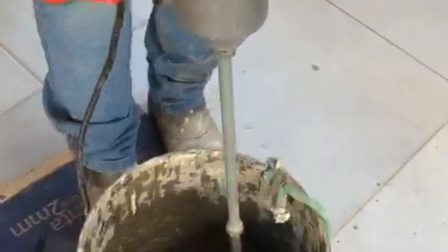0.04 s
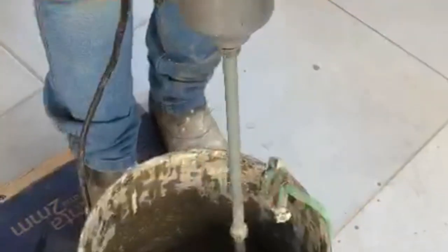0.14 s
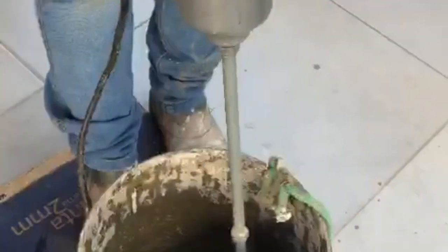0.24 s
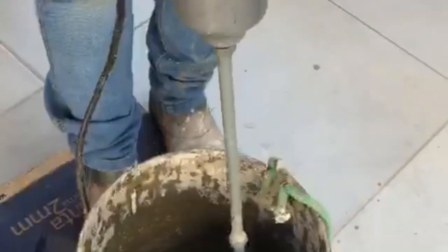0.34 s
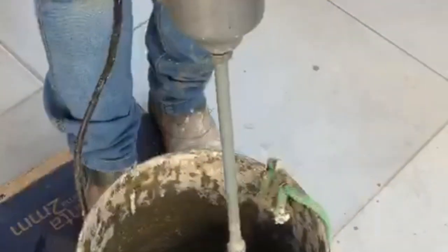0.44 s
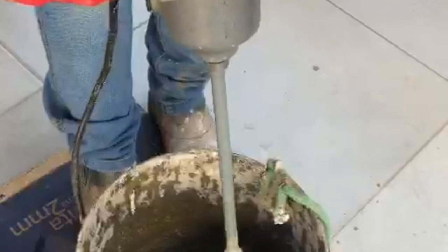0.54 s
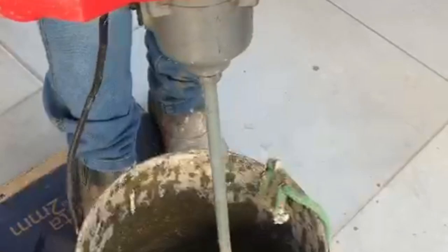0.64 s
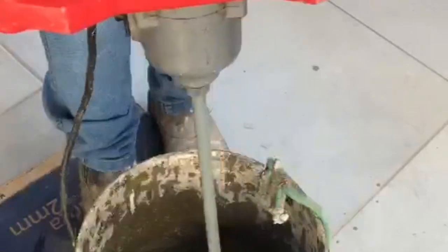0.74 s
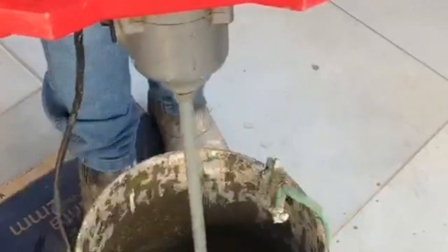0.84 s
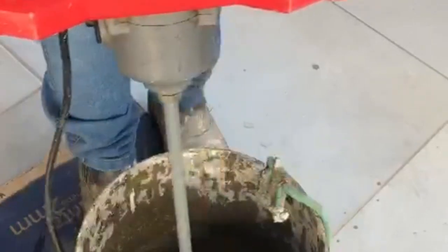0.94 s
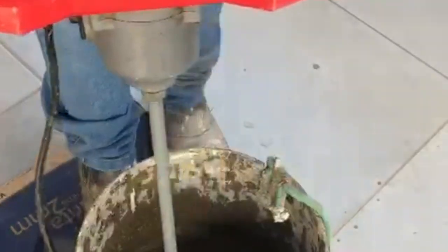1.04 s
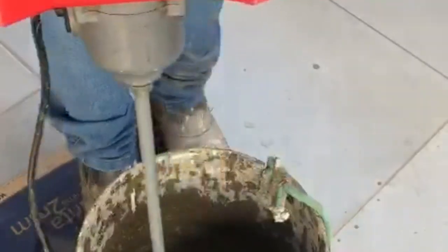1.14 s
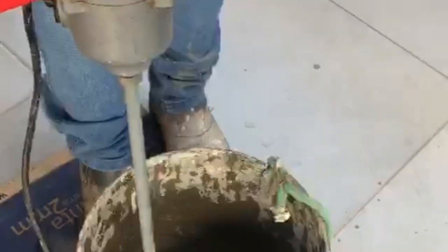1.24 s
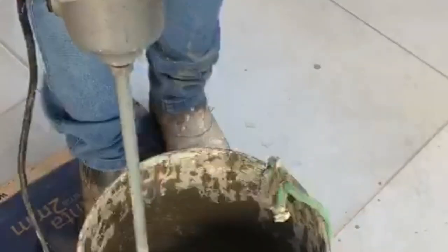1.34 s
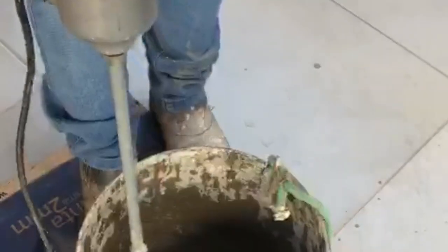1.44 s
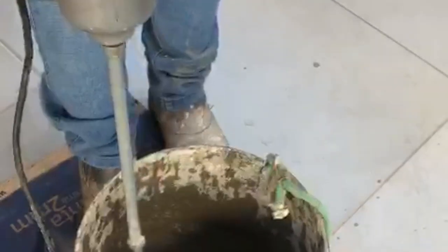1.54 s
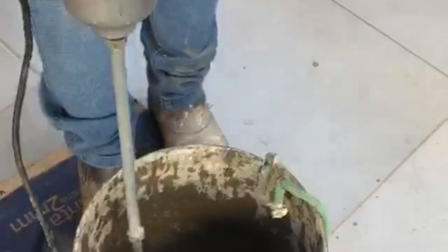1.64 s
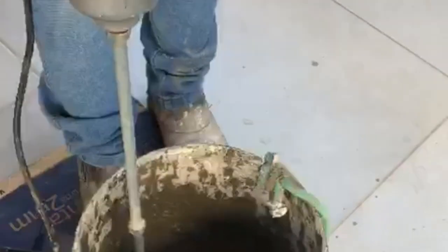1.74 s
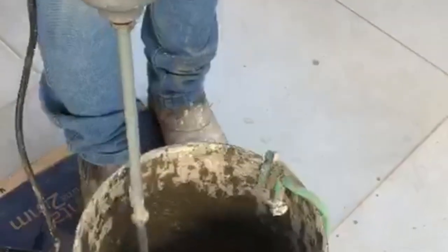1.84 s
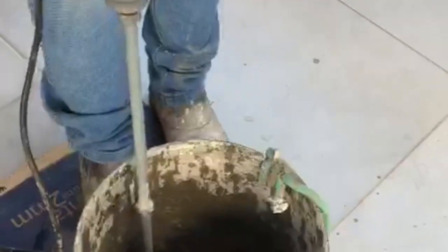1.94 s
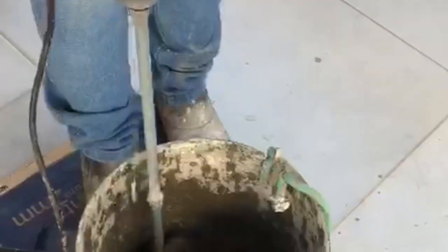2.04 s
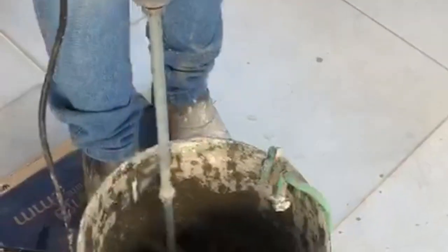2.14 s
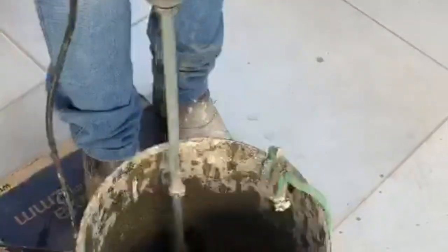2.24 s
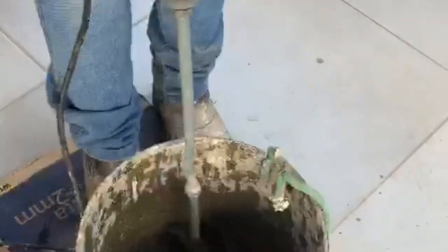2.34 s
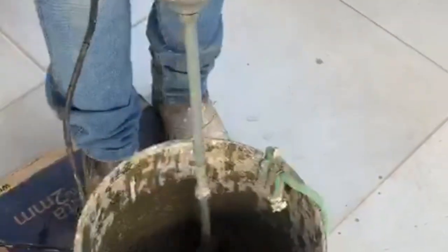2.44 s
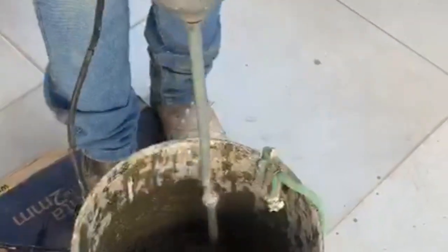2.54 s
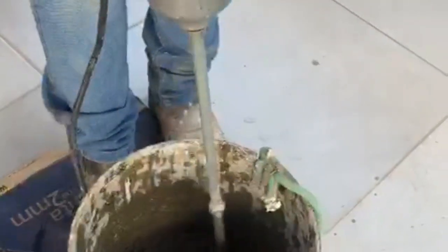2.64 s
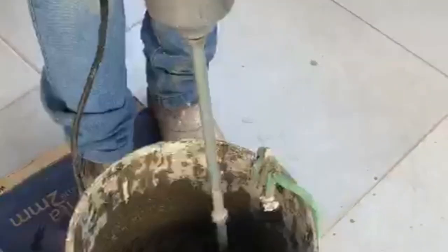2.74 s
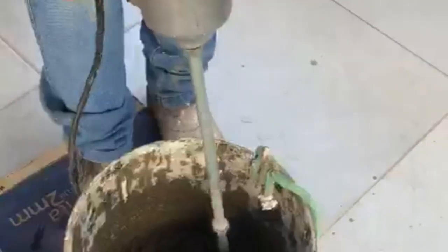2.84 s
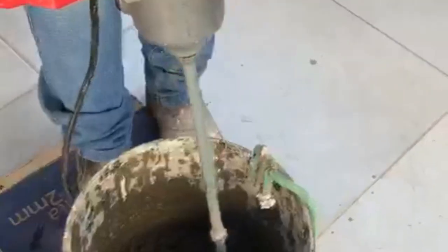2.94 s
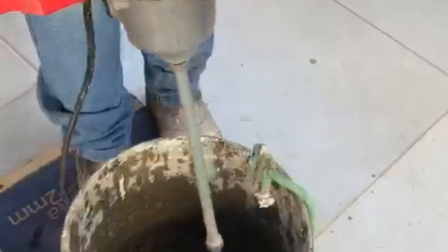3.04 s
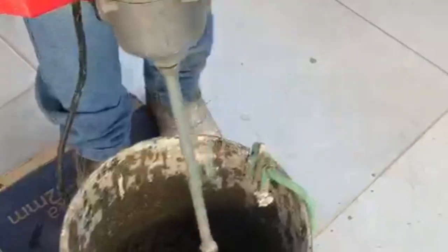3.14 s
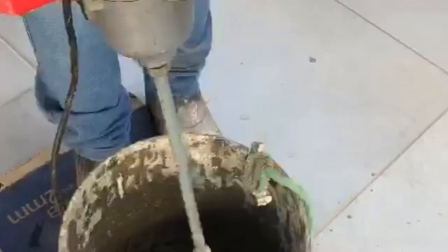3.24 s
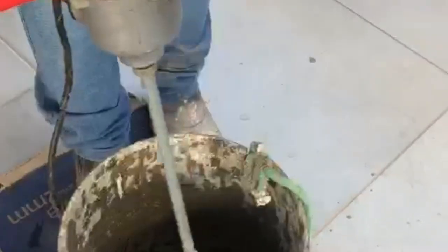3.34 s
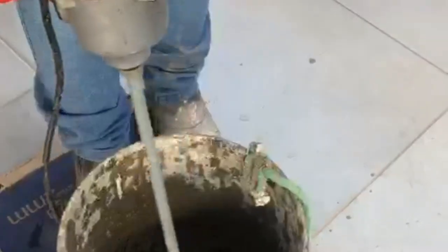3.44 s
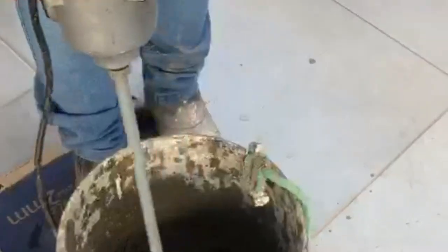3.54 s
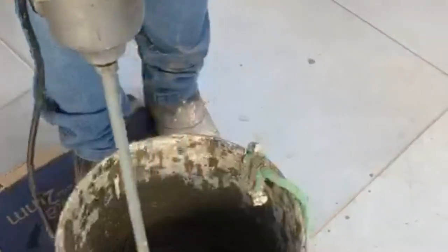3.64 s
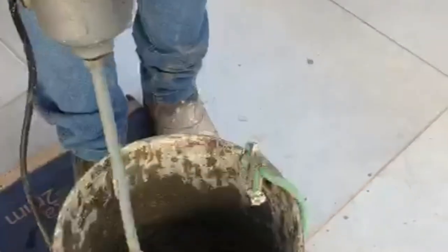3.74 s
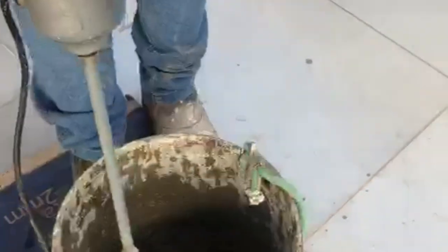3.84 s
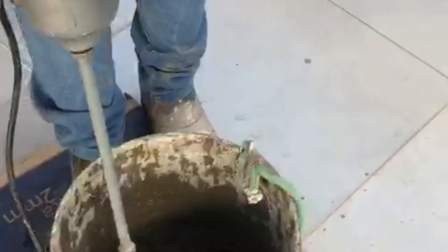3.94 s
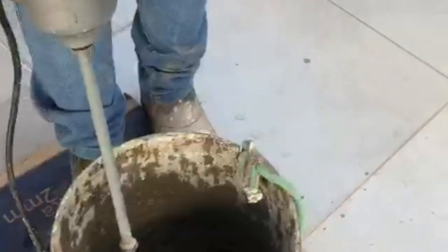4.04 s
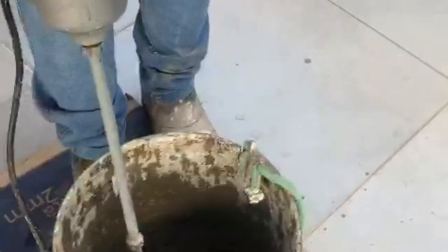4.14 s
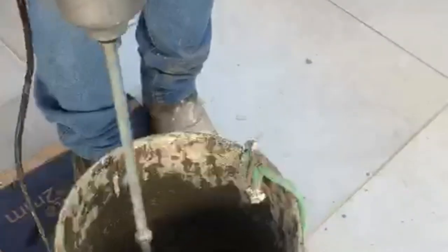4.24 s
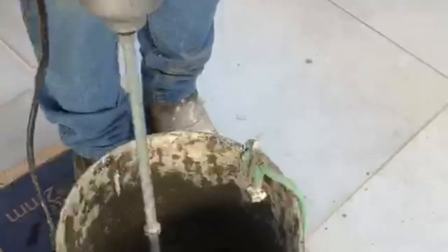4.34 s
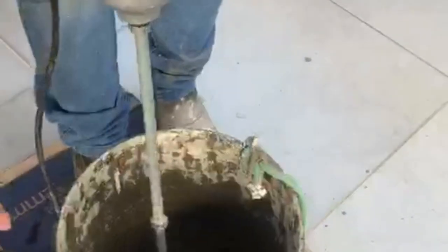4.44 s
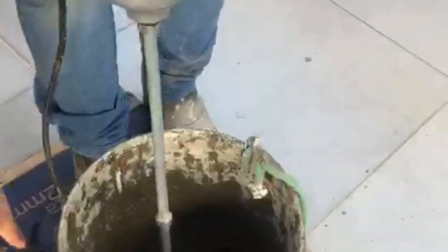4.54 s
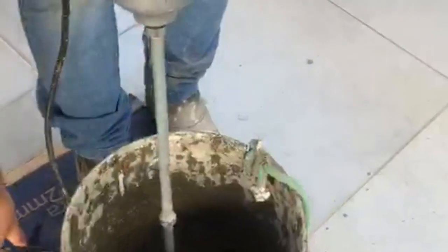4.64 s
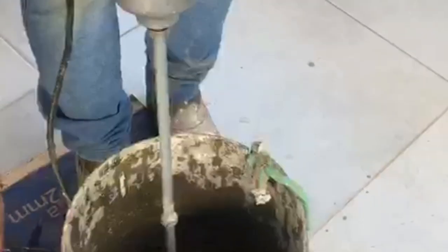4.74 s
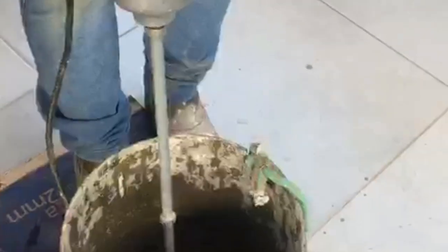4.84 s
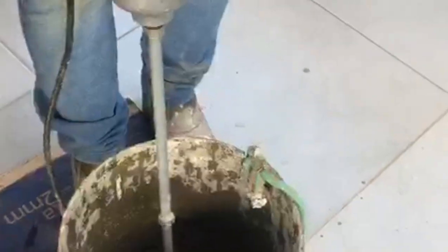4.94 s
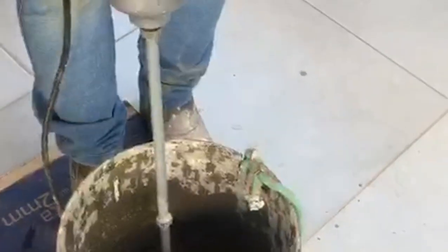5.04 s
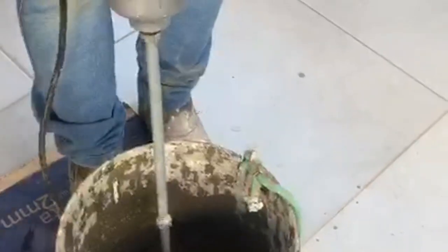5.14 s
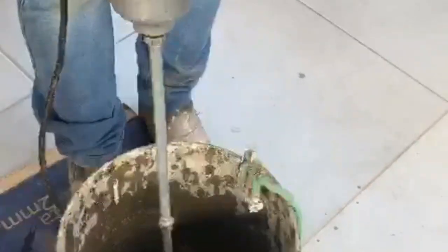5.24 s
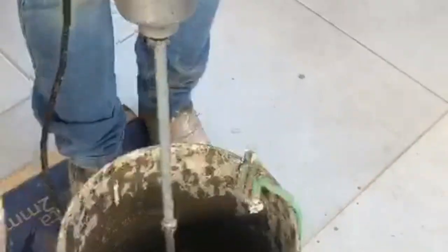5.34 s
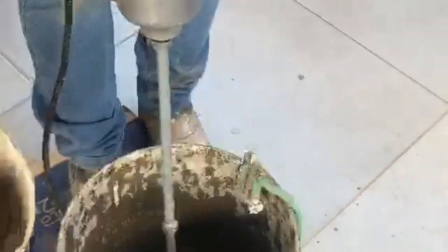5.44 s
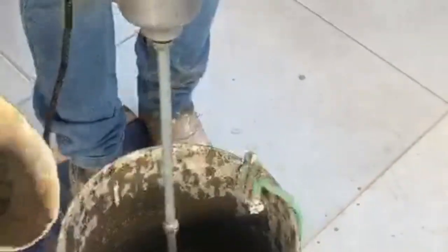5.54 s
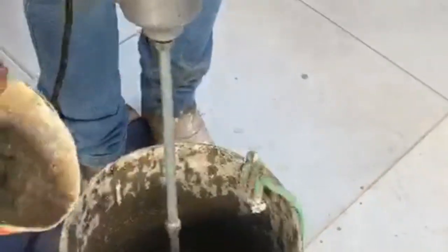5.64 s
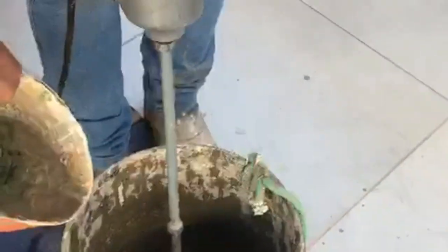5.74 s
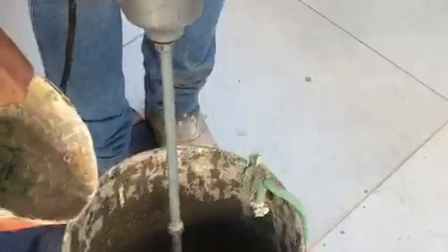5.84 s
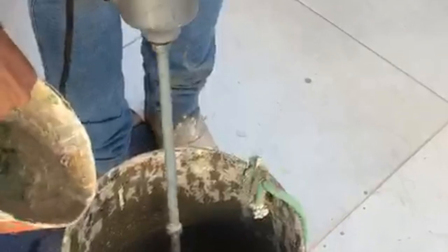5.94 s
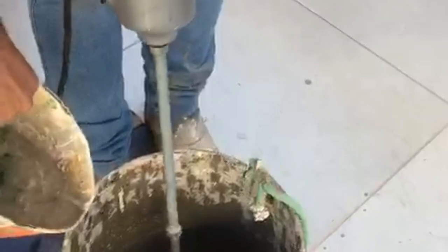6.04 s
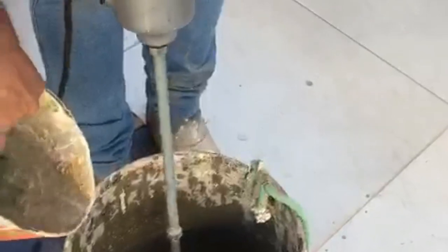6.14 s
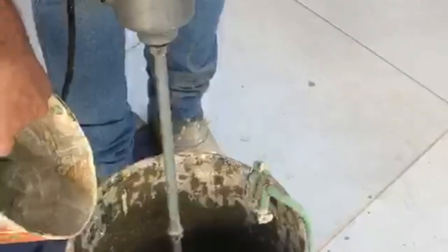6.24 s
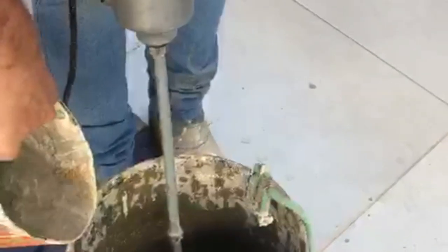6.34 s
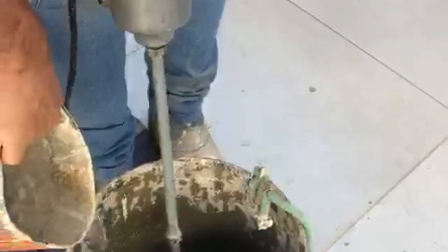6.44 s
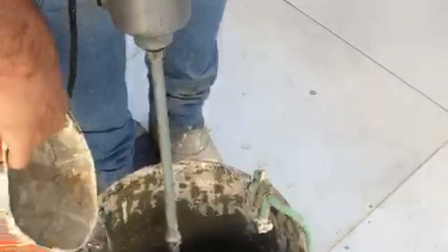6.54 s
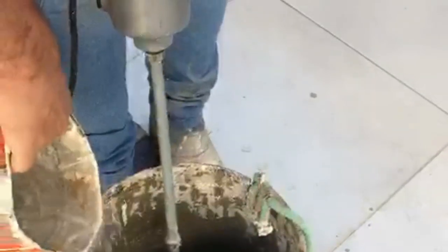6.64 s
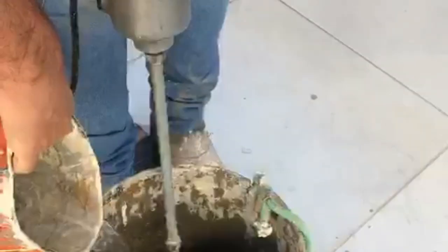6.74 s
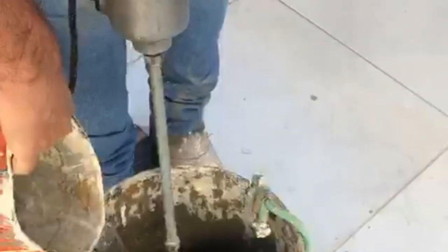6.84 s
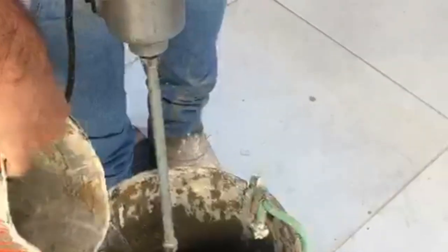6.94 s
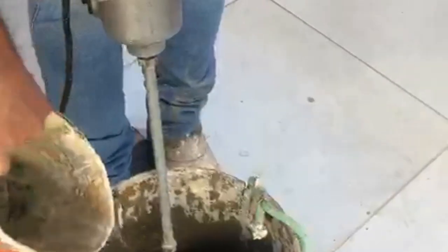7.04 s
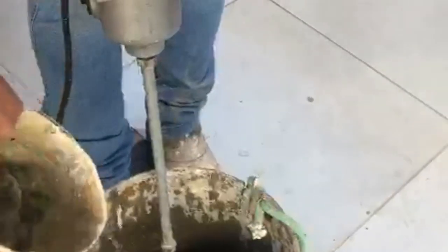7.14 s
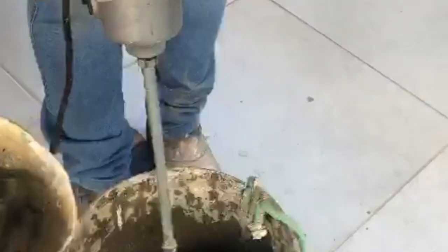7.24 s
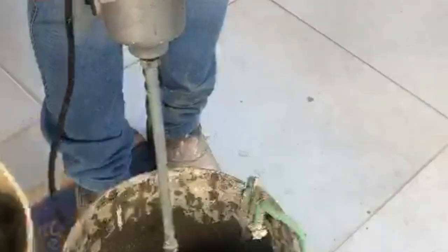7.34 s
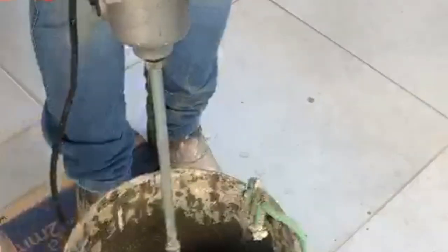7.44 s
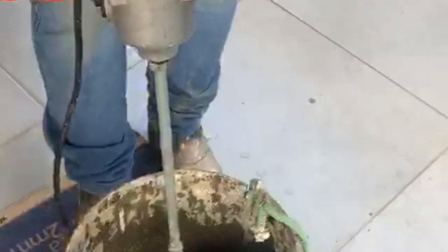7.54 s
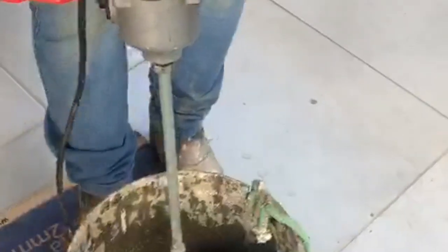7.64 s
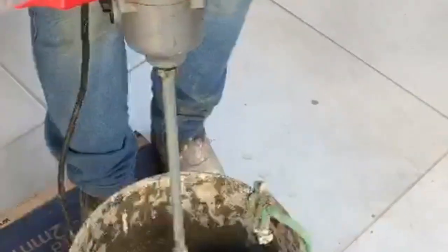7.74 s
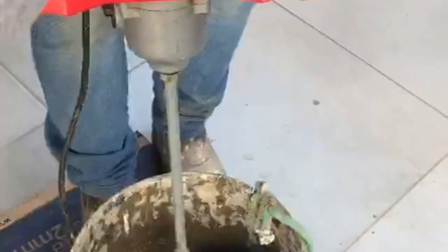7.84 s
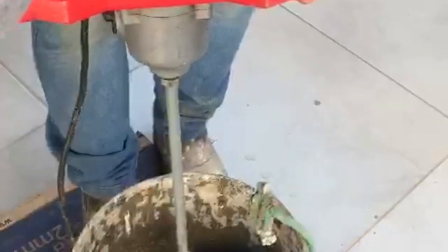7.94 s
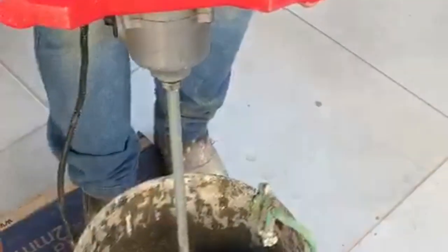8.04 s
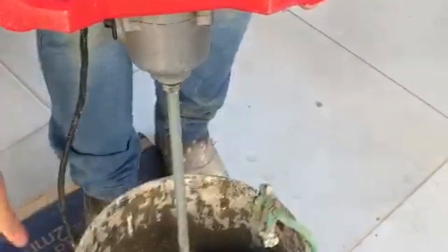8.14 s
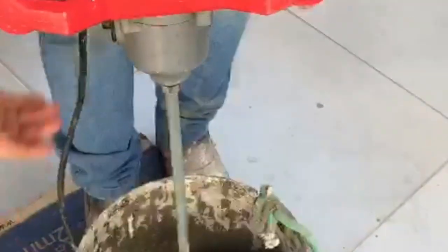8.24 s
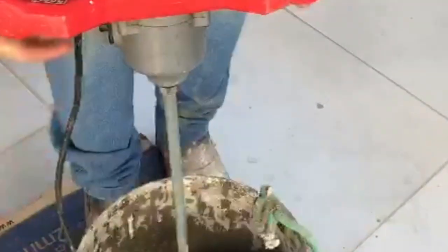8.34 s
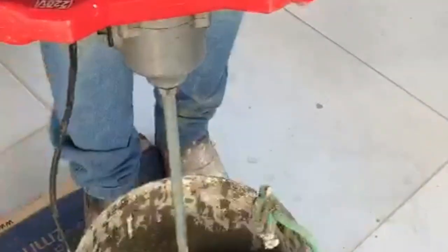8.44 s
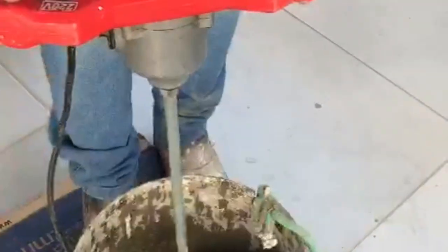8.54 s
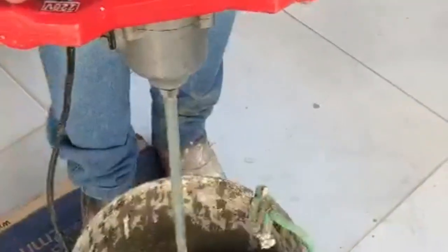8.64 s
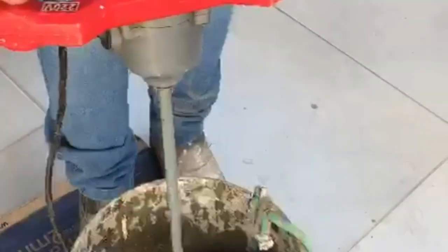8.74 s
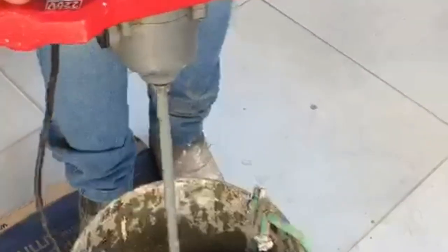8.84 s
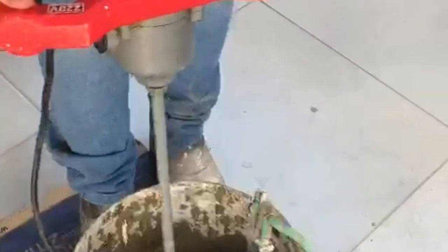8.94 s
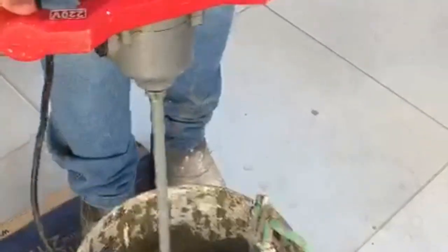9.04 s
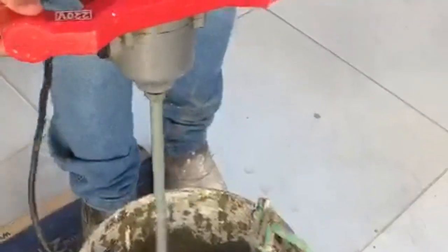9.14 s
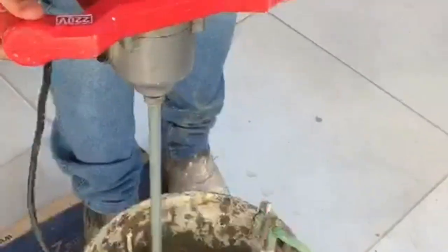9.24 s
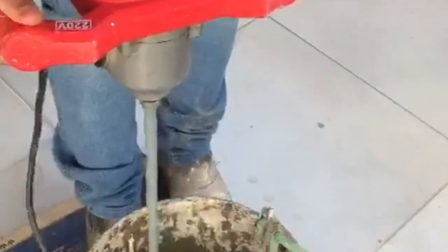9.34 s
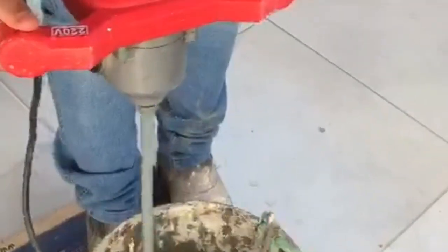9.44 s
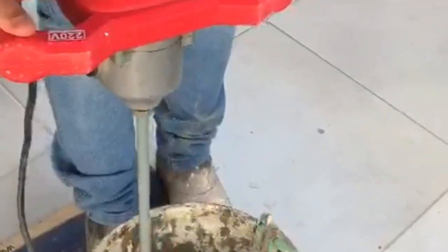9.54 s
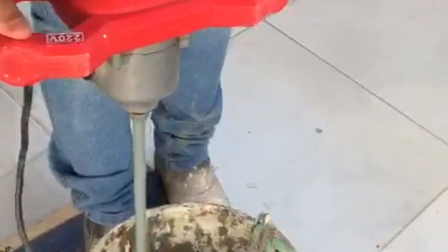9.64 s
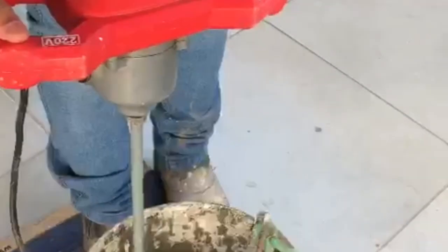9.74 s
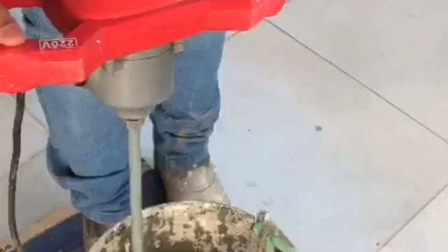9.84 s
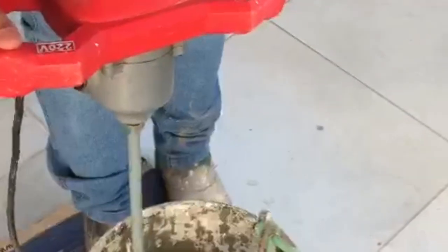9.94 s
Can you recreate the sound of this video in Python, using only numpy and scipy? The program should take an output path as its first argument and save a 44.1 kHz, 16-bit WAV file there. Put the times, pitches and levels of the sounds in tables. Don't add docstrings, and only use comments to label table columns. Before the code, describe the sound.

Electric mortar mixer whirring with a gear whine winds down to quiet; scoop knocks and gritty trickling follow before the trigger snaps it back on.

```python
import sys
import numpy as np
from scipy import signal
from scipy.fft import rfft, irfft
from scipy.io import wavfile
from scipy.ndimage import uniform_filter1d

SR = 44100
rng = np.random.default_rng(int(sys.argv[2]) if len(sys.argv) > 2 else 0)


def volts(x):
    e = np.asarray(x, float) / 20
    return 10 ** e


def wav_out(sig):
    wavfile.write(sys.argv[1], SR, np.round(np.clip(np.atleast_2d(sig).T, -1, 1) * 32767).astype(np.int16))


N = 440559
STEP = 128
POWER_OFF_S, POWER_ON_S, STILL_S = 3.965, 8.72, 6.22
PINION_TEETH, ROTOR_SLOTS, MAINS_PULSE_HZ = 5, 12, 120
FULL_MESH_HZ = 1440

NOW_S = np.arange(N) / SR
MAINS_RAD = 2 * np.pi * MAINS_PULSE_HZ * NOW_S
T_S = np.arange(N // STEP + 1) * STEP / SR
ON_S = np.maximum(T_S - POWER_ON_S, 0)
AGAIN = T_S > POWER_ON_S - 1
BIN_HZ = np.fft.rfftfreq(1024, 1 / SR)[:, None]


def evened(x):
    return x / np.sqrt(np.mean(x ** 2) + 1e-20)


def peaked(x):
    return x / abs(x).max()


def read(points, hz):
    f, value = np.transpose(points)
    return np.interp(np.log(hz + 1), np.log(f + 1), value)


def add(mix, s, sound):
    part = mix[round(s * SR):][:len(sound)]
    part += sound[:len(part)]


def filled(control):
    return np.interp(np.arange(N) / STEP, np.arange(len(control)), control)


def drift(hz):
    steps = rfft(rng.standard_normal(N // STEP + 1))
    smooth = steps / (1 + (np.fft.rfftfreq(N // STEP + 1, STEP / SR) / hz) ** 4)
    return evened(irfft(smooth, N // STEP + 1))


def ring(hz, t60_s, count=6000):
    t = np.arange(count) / SR
    return volts(-60 * t / t60_s) * np.sin(2 * np.pi * hz * t)


def puff(t60_s):
    return rng.standard_normal(2000) * volts(-60 * np.arange(2000) / SR / t60_s)


def tone(phase, db):
    return filled(np.sqrt(2) * volts(db)) * np.cos(phase)


def colour(x, shape_db, patchy_db):
    z = signal.stft(x, nperseg=1024, noverlap=768)[2]
    patches = rng.standard_normal(z.T.shape).T
    patches = uniform_filter1d(patches, size=10, axis=0)
    patches = evened(uniform_filter1d(patches, size=12, axis=1))
    return signal.istft(z * volts(shape_db + patchy_db * patches), nperseg=1024, noverlap=768)[1][:N]


def background():
    # f/Hz, density/dB
    floor = [(12, -32), (36, 0), (71, 1.5), (146, -11.5), (271, -8.5), (318, -12), (693, -22.5),
             (1220, -25.5), (2880, -30), (3970, -30.5), (10400, -31.5), (12300, -41.5), (15900, -82),
             (22000, -120)]
    return volts(-59.5) * evened(colour(rng.standard_normal(N), read(floor, BIN_HZ), patchy_db=2.0))


def room(x):
    # f/Hz, t60/s
    decay = [(200, 0.82), (1500, 0.83), (5000, 0.15), (12000, 0.83)]
    taps = np.zeros(SR // 2)
    at = np.arange(300, len(taps) - 20, 20)
    taps[at + rng.integers(0, 20, len(at))] = rng.choice([-1., 1.], len(at))
    hz, t, z = signal.stft(taps, SR, nperseg=256)
    tail = signal.istft(z * volts(-60 * t / read(decay, hz)[:, None]), SR, nperseg=256)[1]
    return signal.fftconvolve(x, tail / np.linalg.norm(tail))[:N]


def trickle():
    # t/s, level/dB, centre f/Hz
    pours = [
        [(6.44, -65, 4570), (6.776, -63, 7820), (6.866, -51.5, 4270), (7.106, -53.5, 7200),
         (7.176, -52.5, 3770), (7.372, -48.5, 6870), (7.56, -74, 4830)],
        [(7.83, -68, 4460), (7.87, -51, 4700), (8.18, -66, 4260)],
        [(8.4, -79, 6640), (8.444, -55, 7160), (8.56, -73, 5310)],
    ]
    out = np.zeros(N)
    for rows in pours:
        s, *columns = np.transpose(rows)
        t = np.arange(s[0], s[-1], 1 / SR)
        level_db, centre_hz = (np.interp(t, s, c) for c in columns)
        size = volts(1.6 * np.minimum(rng.exponential(1, len(t)), 5)) * rng.choice([-1, 1], len(t))
        size *= volts(4.0 * evened(uniform_filter1d(rng.standard_normal(len(t)), size=300)))
        chance, fall = rng.random((24, len(t))), np.zeros(len(t))
        for k, hz in enumerate(np.geomspace(1900, 12000, 24)):
            near = 0.25 + np.exp(-(np.log(hz / centre_hz) / 0.82) ** 2)
            onset = np.minimum(np.arange(600) * hz / SR, 1)
            grain = volts(5.4 * np.log2(hz / 4000)) * ring(hz, 25 / hz, count=600) * onset
            hits = size * (chance[k] < 300 * near / SR)
            fall += signal.oaconvolve(hits, grain)[:len(t)]
        fall /= np.sqrt(uniform_filter1d(fall ** 2, size=3000) + 1e-9)
        add(out, s[0], volts(level_db - 6.5) * fall * signal.windows.tukey(len(t), .05))
    return out


def lumps():
    # t/s, peak/dB, ring f/Hz
    landings = [(6.463, -49, 1520), (6.467, -51, 4500), (6.4876, -47, 6650), (6.7205, -51, 9150),
                (6.7664, -49.5, 9100), (6.856, -52, 3120), (6.9137, -51, 4520), (6.943, -47, 2100),
                (7.0, -49, 6810), (7.0194, -51, 6330), (7.1785, -44, 3800), (7.191, -41.5, 3640),
                (7.2074, -45, 5410), (7.219, -50, 2510), (7.247, -44, 4300), (7.3437, -40, 3300),
                (7.352, -40, 8500), (7.365, -49, 5660), (7.4, -54, 3450), (7.634, -47, 4500),
                (7.642, -48, 4600), (7.7217, -49, 5400), (7.762, -60, 3000), (7.897, -40.5, 6600),
                (7.841, -51, 3000), (7.861, -39, 4060), (7.871, -39.5, 2840), (7.8793, -36, 1900),
                (8.078, -49, 2660), (8.0922, -47, 1920)]
    out = np.zeros(N)
    for s, db, hz in landings:
        body = signal.oaconvolve(puff(0.07), ring(hz, 0.0052, count=2000))
        add(out, s, volts(db + 2) * peaked(body))
        add(out, s, volts(db - 1.0) * np.diff(puff(0.029)))
    return out


def glides():
    # t/s, length/s, start f/Hz, end f/Hz, level/dB, waver/0-1
    sweeps = [
        (6.15, 0.32, 2750, 3000, -66, .1),
        (6.523, 0.045, 7060, 4800, -54, 0.08),
        (6.55, 0.13, 5000, 4750, -61, 0.07),
        (7.645, 0.02, 1325, 1990, -45, 0),
        (7.997, .035, 5750, 5000, -55, 0.04),
        (8.03, .12, 5650, 5550, -68, 0.015),
    ]
    out = np.zeros(N)
    for s, length_s, start_hz, end_hz, db, rough in sweeps:
        count = round(length_s * SR)
        waver = 1 + rough * evened(uniform_filter1d(rng.standard_normal(count), size=40))
        turns = np.cumsum(np.geomspace(start_hz, end_hz, count) * waver) / SR
        add(out, s, volts(db) * np.sin(2 * np.pi * turns) * signal.windows.tukey(count, .5))
    return out


def knocks():
    # t/s, peak/dB, brightness/(dB/octave)
    hits = [(6.462, -52, -16), (6.486, -65, -8), (7.633, -40, 11), (7.842, -43, -21), (7.867, -42, 2),
            (7.879, -46, 7), (7.899, -35, 2), (8.022, -42.5, 2), (8.048, -55, -1), (8.089, -43, 4),
            (8.219, -59, -12)]
    # f/Hz, level/dB, t60/s
    modes = [(250, -3, .08), (365, 0, .25), (470, 0, .25), (700, -4, .05), (900, -4, .05), (1290, -8, .11),
             (1750, -3, .04), (2000, -4, .04)]
    out = np.zeros(N)
    for s, db, bright_db in hits:
        body = sum(volts(d + bright_db * np.log2(f / 400)) * ring(f, t60, count=12000) for f, d, t60 in modes)
        add(out, s, volts(db) * peaked(signal.oaconvolve(body, puff(0.0067))))
    return out


def clicks():
    # t/s, peak/dB, ring f/Hz
    trigger = [
        (8.7188, -23.5, 7050),
        (8.727, -29, 1900),
        (8.728, -25, 2330),
        (8.736, -25, 2530),
        (8.7435, -21, 2200),
        (8.751, -34.5, 385),
    ]
    # t/s, peak/dB, ring f/Hz
    clods = [
        (6.4635, -44, 524),
        (6.4675, -50, 380),
        (6.489, -53, 910),
        (6.494, -58, 700),
    ]
    out = np.zeros(N)
    for s, db, hz in [*trigger, *clods]:
        add(out, s, volts(db) * peaked(signal.oaconvolve(puff(0.022), ring(hz, 14 / hz, count=2000))))
    return out


def mesh_rate():
    # t/s, mesh f/Hz
    stirring = [
        (0.0, 1347),
        (0.14, 1372),
        (0.35, 1405),
        (0.56, 1430),
        (0.77, 1440),
        (1.54, 1441),
        (2.1, 1429),
        (3.22, 1397),
        (3.96, 1424),
    ]
    s, hz = np.transpose(stirring)
    drag_hz, coast_per_s, slowest_hz = 1467, .3511, 20
    angle = np.arctan(hz[-1] / drag_hz) - coast_per_s * (T_S - POWER_OFF_S)
    coast = np.maximum(drag_hz * np.tan(np.maximum(angle, 0)), slowest_hz)
    climb_hz, climb_lead_s, climb_s, creep_hz_per_s = 1194, .122, .498, 67.5
    kick_hz, kick_s = 115, .12
    climb = climb_hz * np.tanh((ON_S + climb_lead_s) / climb_s) + creep_hz_per_s * ON_S
    climb += kick_hz * np.exp(-(ON_S / kick_s) ** 2)
    before = np.where(T_S < POWER_OFF_S, np.interp(T_S, s, hz), coast)
    return np.where(AGAIN, climb, before)


def housing_db(hz):
    # f/Hz, width/Hz, level/dB
    modes = [(363, 170, -4.5), (555, 42, -14), (1060, 138, -4.5), (1690, 94, 5), (2560, 130, -0.5),
             (3300, 1500, -7), (7200, 350, -2.5), (10140, 1200, -10)]
    top = max(db for _, _, db in modes)
    lift = sum(volts(db - top) ** 2 / (1 + (2 * (hz - f) / w) ** 2) for f, w, db in modes)
    return 10 * np.log10(0.066 + lift)


def radiated_db(hz):
    return 0.83 * housing_db(hz) - 10 * np.log10(1 + (330 / hz) ** 6 + (hz / 13000) ** 30)


def bucket_rumble():
    rub_s, rub_length_s, rub_db = 1.9, 0.96, 11
    rub = np.clip((T_S - rub_s) / rub_length_s, 0, 1)
    rumble_db = -72.5 + 12 * ON_S + rub_db * np.sqrt(abs(np.sin(np.pi * rub)))
    band = signal.butter(2, [.0025, .008], "band")
    shake = evened(signal.lfilter(*band, rng.standard_normal(N)))
    return filled(volts(rumble_db)) * shake


def rattle(angle, rotor_hz):
    out, place = np.zeros(N), (angle / (2 * np.pi) % 1) * 2048
    blend = 11 * NOW_S
    for low, high in [(6, 43), (43, 110)]:
        audible = np.clip((SR / 2 - high * rotor_hz) / 2000, 0, 1)
        for k in range(3):
            lines = np.zeros(1025, complex)
            lines[low:high] = rng.standard_normal(high - low) + 1j * rng.standard_normal(high - low)
            turn = np.interp(place, np.arange(2049), np.resize(irfft(lines) * 1024, 2049))
            out += turn * audible * np.cos(blend + k * np.pi / 3) ** 2
    return out * np.sqrt(rotor_hz / SR)


def air_roar(angle, rate, roar_db, vent_db):
    # f/Hz, density/dB
    roar = [(53, -55.5), (90, -32.5), (205, -16.5), (404, -4.5), (506, -10), (573, -3), (900, -3.5),
            (1200, -1), (1810, -6.5), (2010, -2.5), (6090, -5), (7960, -10), (10600, -10.5), (11500, -7.5),
            (12300, -47.5), (15900, -86), (22000, -120)]
    coast_treble_db, start_dull_db, start_dull_s = 5, -9, 0.096
    loose_driven, loose_coasting, slacken_s = .08, .36, .9
    rotor_hz = rate / PINION_TEETH
    dull_db = start_dull_db * np.exp(-ON_S / start_dull_s)
    treble_db = np.where(AGAIN, dull_db, coast_treble_db * np.clip(T_S - POWER_OFF_S, 0, 1))
    treble_db += .15 * vent_db
    frames = np.minimum(np.arange(-(-N // 256) + 1) * 256 // STEP, len(T_S) - 1)
    slow = 1 - rotor_hz[frames] / rotor_hz.max()
    tilt = treble_db[frames] - np.median(treble_db[T_S < 4])
    tilt = tilt * np.clip(np.log(BIN_HZ / 1500 + .01) / 3.1, 0, 1)
    slack = ~AGAIN * np.clip((T_S - POWER_OFF_S) / slacken_s, 0, 1)
    loose = filled((loose_driven + loose_coasting * slack) * np.clip(rotor_hz / 110, 0, 1))
    drive = np.sqrt(1 - loose) * rng.standard_normal(N)
    drive += np.sqrt(2 * loose) * rattle(angle, filled(rotor_hz))
    shape_db = read(roar, BIN_HZ) + tilt + (0.38 + 1.3 * slow) * housing_db(BIN_HZ)
    air = colour(drive, shape_db, patchy_db=1.5)
    low_band = signal.lfilter(*signal.butter(2, [.0136, .05], "band"), air)
    return air * filled(volts(roar_db - 3.5)) / np.sqrt(uniform_filter1d(low_band ** 2, size=16000))


def slot_buzz(angle, rate, roar_db, near_db):
    # offset/mains pulses, level/dB
    sidebands = [(-1.8, -10), (-1., -1), (0., 0), (1., -1), (2.6, -10)]
    # multiple of slot tone, level over a blend of buzz and roar/dB
    upper = [(2., -8), (3., -7), (4., -6)]
    slot_hz = ROTOR_SLOTS * rate / PINION_TEETH
    torque = np.clip((1 - rate / FULL_MESH_HZ) / 0.18, 0, 1)
    buzz_db = -41.5 + 10.5 * torque + near_db
    wake_s, wake_length_s, asleep_db = .23, .05, -18
    buzz_db += asleep_db * AGAIN * np.clip((wake_s - ON_S) / wake_length_s, 0, 1)
    out = np.zeros(N)
    for m, db in sidebands:
        phase = ROTOR_SLOTS * angle + m * MAINS_RAD + filled(0.19 * drift(2.6))
        lift_db = 0.9 * housing_db(slot_hz + m * MAINS_PULSE_HZ)
        out += tone(phase, buzz_db + db + 1.8 * drift(7.9) + 6 + lift_db)
    upper_db = 0.51 * buzz_db + 0.72 * roar_db + 4 + 10 * np.log10(rate / FULL_MESH_HZ)
    for k, top_db in upper:
        for m, db in sidebands[1:4]:
            level_db = upper_db + top_db + db + 7.2 * drift(5.8) + radiated_db(k * slot_hz)
            out += tone(k * ROTOR_SLOTS * angle + m * MAINS_RAD, level_db)
    return out


def shaft_tones(angle, rate, roar_db):
    # turns of rotor, level over roar/dB
    orders = [(1.4, -11), (2, -8.5), (2.8, -8.5), (4.2, -9), (5.6, -16.5), (7, -11), (9, -17), (14, -10.5),
              (16, -7.5), (17, -15), (22, -13), (25, -4.5), (35, -7), (36, -6.5), (39, -7.5), (41, -11.5),
              (48, -5.5), (60, -5)]
    decades = np.log10(rate / FULL_MESH_HZ)
    out = np.zeros(N)
    for k, db in orders:
        level_db = roar_db + db + .45 * k * decades + radiated_db(k * rate / PINION_TEETH)
        out += tone(k * angle + k, level_db + 2.66 * drift(3.3) + 3 * drift(32))
    return out


def gear_mesh(angle, rate, roar_db, vent_db, tooth_db):
    # multiple of mesh rate, level over roar/dB, speed slope/(dB/decade), vent share, tooth share
    harmonics = [(1, -6, -2, .1, 0.27), (2, -0.5, -16.5, .1, 1), (3, 0.5, 12, 0.048, 0.26),
                 (4, 3.5, 7.5, .1, 0.72), (8, 6, 2., 0.69, .1)]
    coast_mesh_db = [8.5, -0.5, 8.5, -1.5, -1]
    decades = np.log10(rate / FULL_MESH_HZ)
    coasting = np.clip((T_S - POWER_OFF_S) / .05, 0, 1) * ~AGAIN
    out = np.zeros(N)
    for (k, db, speed_db, vent, tooth), coast_db in zip(harmonics, coast_mesh_db):
        lift_db = housing_db(k * rate)
        level_db = roar_db + db + speed_db * decades + vent * vent_db + tooth * tooth_db
        level_db += coast_db * coasting + 0.9 * lift_db + 0.44 * coasting * (lift_db + 8.5)
        level_db -= 10 * np.log10(1 + (700 / (k * rate)) ** 6)
        level_db += 3 * drift(2.3) + 2.32 * drift(22)
        out += tone(k * PINION_TEETH * angle + k, level_db)
    return out


def mixer():
    # t/s, nearness/dB, vents to microphone/dB, pressure on teeth/dB
    hold = [(0, 0.5, -3.5, 4.5), (.22, 0, 8.5, 2), (.6, -0.5, 4, -9), (.9, 0, 3.5, 7),
            (1.3, -0.5, 10, -2.5), (1.75, 1, -6, -0.5), (2.2, 0.5, -12, -6), (2.55, 0.5, -2, 4.5),
            (3.0, -0.5, -9.5, 1), (3.35, 0, 5.5, 7), (3.9, 0, -12, 4), (4.4, -1, 11, -5.5),
            (5.1, -1.5, -5, 2.5), (6.0, 1.5, -5, -18), (8.72, 0, -9, -14), (9.1, -0.5, -3, 2),
            (9.5, 0, -1, 6), (9.99, 0.5, 0.5, 3.5)]
    hold_s, *columns = np.transpose(hold)
    near_db, vent_db, tooth_db = (np.interp(T_S, hold_s, c) for c in columns)
    rate = uniform_filter1d(mesh_rate(), size=12)
    roar_db = -33.5 + 25 * np.log10(rate / FULL_MESH_HZ) + near_db
    angle = 2 * np.pi * np.cumsum(filled(rate / PINION_TEETH + 0.1557 * drift(25.6))) / SR
    turning = np.clip(np.maximum((NOW_S - POWER_ON_S) / 0.004, (STILL_S - NOW_S) / 0.048), 0, 1)
    current = np.clip(np.maximum(POWER_OFF_S - NOW_S, NOW_S - POWER_ON_S) / 0.016, 0, 1)
    out = gear_mesh(angle, rate, roar_db, vent_db, tooth_db)
    out += shaft_tones(angle, rate, roar_db)
    out += current * slot_buzz(angle, rate, roar_db, near_db)
    out += air_roar(angle, rate, roar_db, vent_db) * (1 + 0.053 * current * np.cos(MAINS_RAD))
    return turning * (out + bucket_rumble())


def scene():
    tool = mixer()
    scoop = trickle() + lumps() + glides() + knocks() + clicks()
    mono = tool + scoop + room(volts(-9.5) * tool + volts(-6.5) * scoop) + background()
    return np.array([mono, mono])


def low_pass(x):
    return signal.sosfilt(signal.butter(12, 12410, fs=SR, output="sos"), x)


def record(dry):
    edge = signal.firwin(301, 12000, window=("kaiser", 8), fs=SR)
    hz, _, z = signal.stft(np.convolve(dry[0], edge, "same"), SR, nperseg=2048, noverlap=1024)
    power = uniform_filter1d(abs(z[:1024]) ** 2, size=2, axis=1).reshape(64, 16, -1)
    masker = np.maximum.accumulate(power.max(1) * (hz[:1024:16, None] > 8800), axis=0)
    masked = (power.mean(1) < masker * volts(-18.5) ** 2) & (power.max(1) < masker / 10)
    z[:1024] *= 1 - np.repeat(masked, 16, axis=0)
    mono = signal.istft(z, nperseg=2048, noverlap=1024)[1][:N]
    return low_pass(np.array([mono, mono]))


dry = scene()
out = record(dry)
wav_out(out)
```